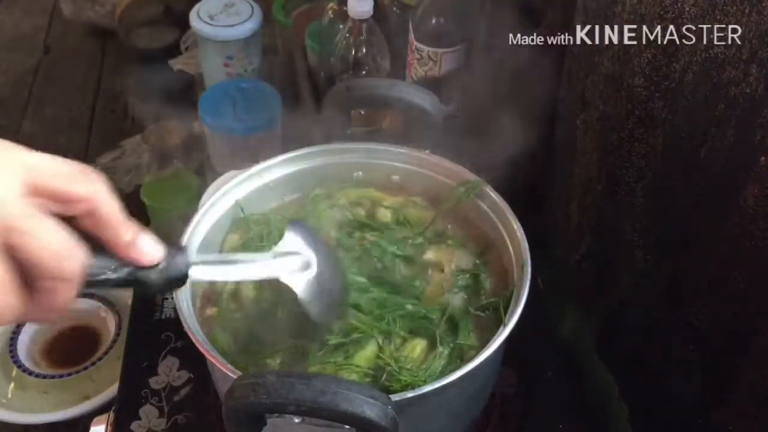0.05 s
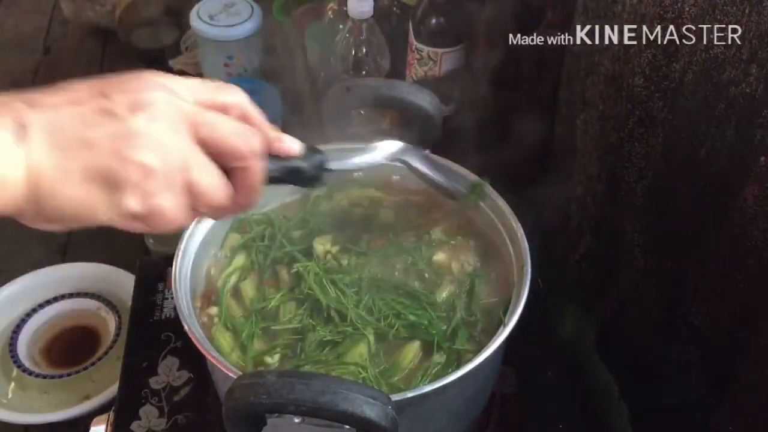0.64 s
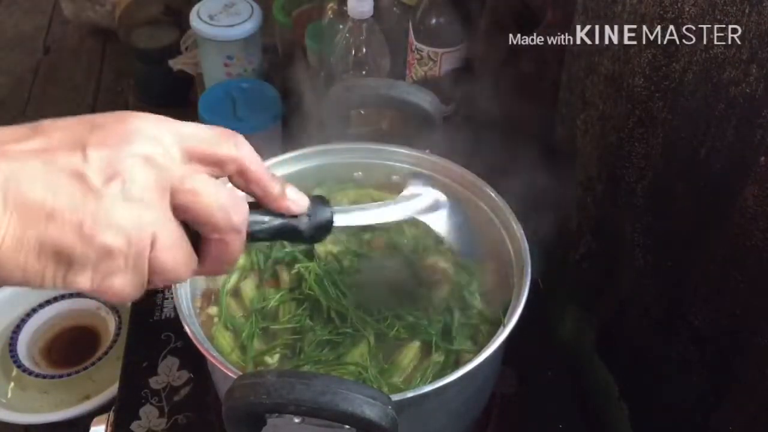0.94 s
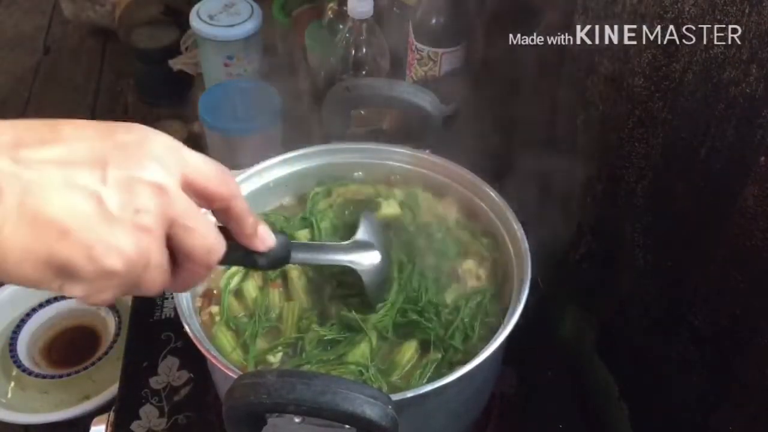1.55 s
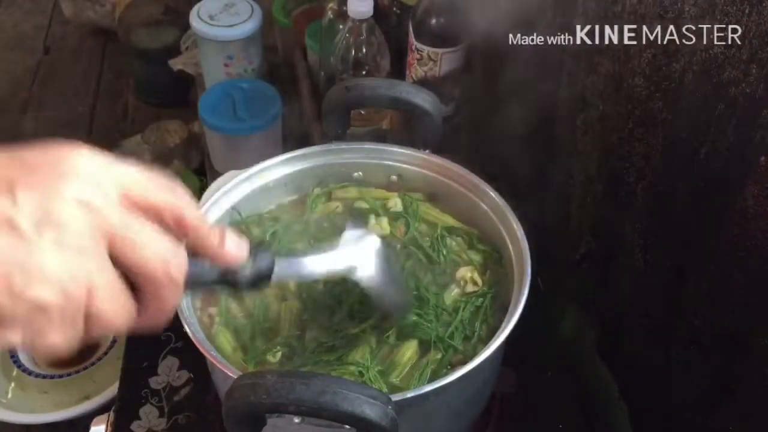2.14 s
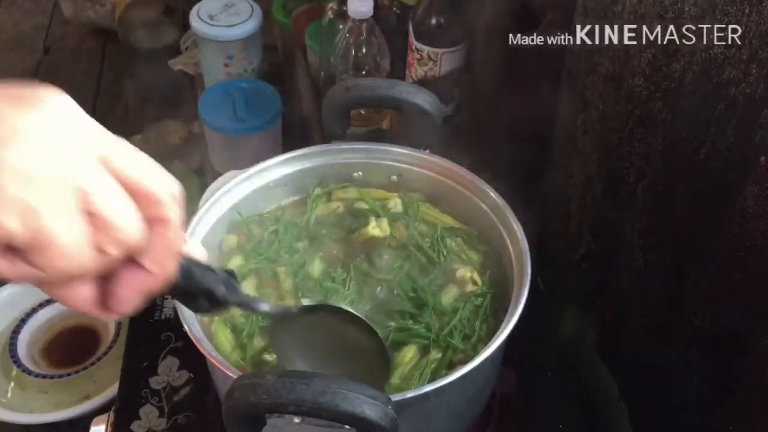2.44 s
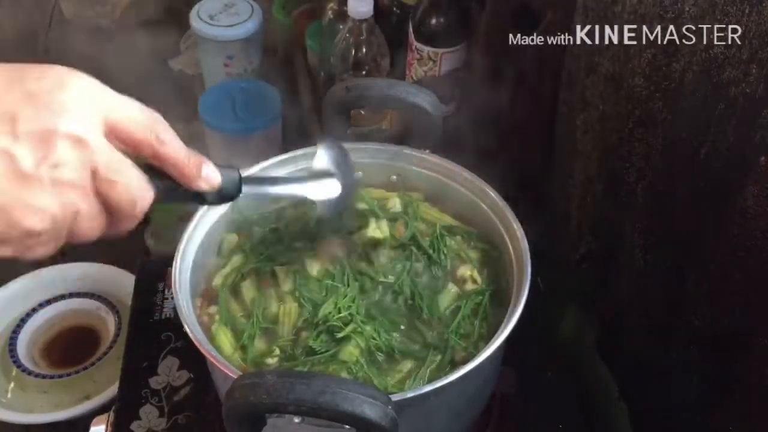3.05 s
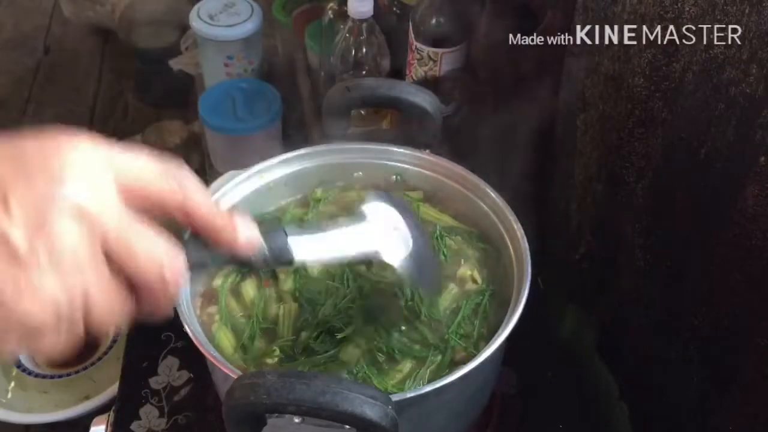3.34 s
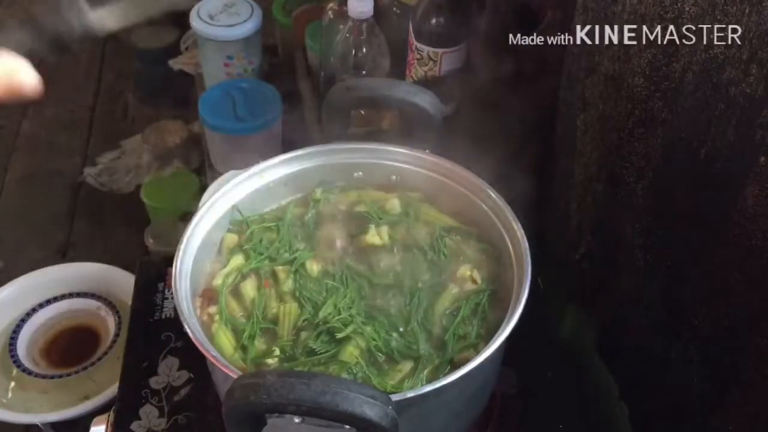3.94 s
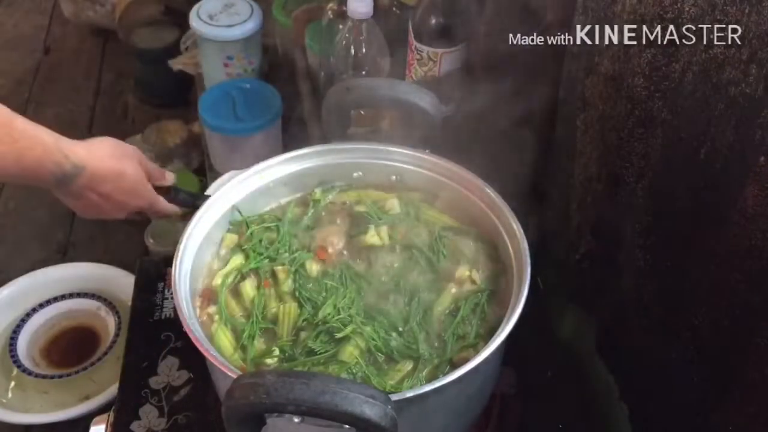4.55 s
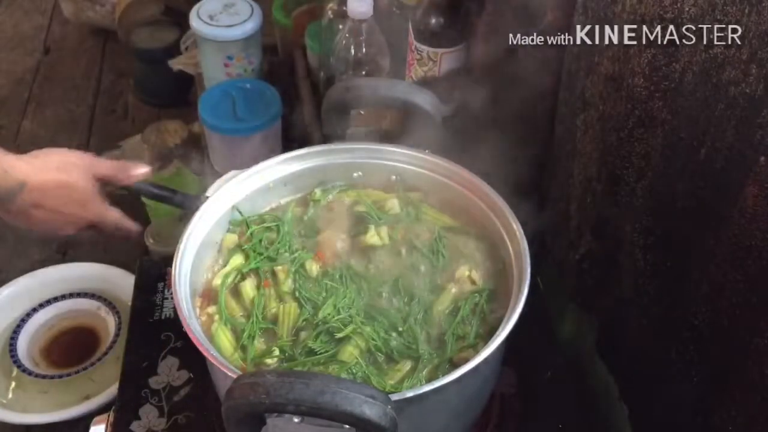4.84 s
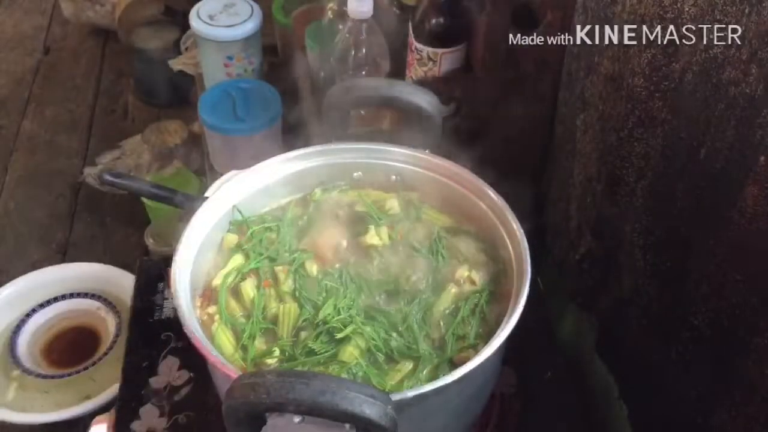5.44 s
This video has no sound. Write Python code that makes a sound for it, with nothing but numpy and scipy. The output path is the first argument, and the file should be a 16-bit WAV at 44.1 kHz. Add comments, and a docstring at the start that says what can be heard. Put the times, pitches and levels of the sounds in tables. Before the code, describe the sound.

Close bubbling and popping of a boiling pot, soft wet stirring and ringing ladle knocks, over distant birds and a low kitchen drone.

```python
"""Bubbles pop all the time in a boiling pot of curry, as steam breaks through the surface.
A steel ladle swishes the wet greens under and knocks on the pot, making the metal ring.
At the end the ladle is laid on a wooden board, which clacks and booms.
Small birds chirp some way off, over the low drone of the kitchen."""
import sys
import numpy as np
from scipy import signal
from scipy.fft import rfft, irfft, next_fast_len
from scipy.io import wavfile
from scipy.ndimage import map_coordinates

SR = 44100
rng = np.random.default_rng(int(sys.argv[2]) if len(sys.argv) > 2 else 0)


def log_audio(samples):
    """Write samples as a 16-bit WAV file to the path given in sys.argv[1]."""
    # one column per channel
    frames = np.atleast_2d(samples).T
    # limit to full scale, then quantise
    limited = np.clip(frames, -1, 1)
    pcm = np.round(limited * 32767).astype(np.int16)
    wavfile.write(sys.argv[1], SR, pcm)


N = 251811

# The loudest bubble pops: start_s, level_db, pitch_hz
LOUD_POPS = [(0.03, -34, 1450), (0.045, -30, 1300), (0.071, -28, 1710), (0.079, -22, 2590),
             (0.172, -31, 1050), (0.189, -34, 1270), (0.347, -34, 1080), (0.431, -33, 1180),
             (0.44, -35, 996), (0.562, -39, 1010), (0.581, -33, 1740), (0.653, -35, 1520),
             (0.677, -38, 703), (0.692, -35, 1000), (0.727, -29, 1330), (0.748, -36, 942),
             (0.791, -28, 3360), (0.885, -35, 945), (1.044, -34, 2210), (1.124, -38, 2860),
             (1.317, -38, 1280), (1.379, -38, 1130), (1.431, -37, 1180), (1.509, -29, 1270),
             (1.654, -30, 867), (1.671, -29, 1420), (1.681, -31, 1210), (1.785, -38, 1190),
             (1.835, -37, 1160), (1.896, -31, 1200), (1.909, -20, 1960), (1.93, -28, 1320),
             (2.139, -33, 1270), (2.277, -31, 1640), (2.535, -35, 2010), (2.677, -33, 964),
             (2.699, -28, 1360), (2.749, -35, 1230), (2.786, -30, 1430), (2.81, -34, 2440),
             (2.829, -32, 1440), (2.862, -30, 1880), (2.885, -34, 891), (2.966, -27, 2220),
             (3.01, -38, 1960), (3.04, -34, 1080), (3.164, -31, 1900), (3.185, -30, 1030),
             (3.202, -25, 2010), (3.383, -32, 1320), (3.456, -32, 931), (3.527, -36, 751),
             (3.638, -29, 2130), (3.789, -29, 1350), (3.891, -29, 1450), (3.929, -36, 1010),
             (3.952, -31, 1140), (3.97, -33, 2040), (3.999, -33, 2700), (4.023, -33, 2120),
             (4.091, -29, 1440), (4.234, -32, 1420), (4.492, -33, 735), (4.535, -35, 1500),
             (4.657, -32, 1200), (4.885, -34, 1280), (4.926, -35, 956), (5.04, -33, 1420),
             (5.054, -30, 1320), (5.25, -38, 869), (5.33, -33, 1780), (5.412, -35, 1350),
             (5.555, -27, 1140), (5.64, -37, 1220)]
def pops():
    """Single bubbles burst, each with a wet splash; quieter ones come by chance."""
    out, t = np.zeros(N), np.arange(2048) / SR
    usual_hz = 1100
    quiet_pops = chance(per_s=6, db=-42, scatter_db=2.5, hz=usual_hz, octaves=.5)
    for s, db, hz in LOUD_POPS + quiet_pops:
        life, delay = rng.random(2)
        pop = amp(db) * bubble(hz, cycles=(.9 + life) * np.sqrt(hz / usual_hz), rise=.15)
        splash = amp(db - 19) * fade(t, .04) * noise_band(hz, 1.1, len(t))
        add(out, s + .0002, pop)
        add(out, s + .004 + .008 * delay, amp(-14) * pop)  # bounces off the pot and the wall
        add(out, s + .0008, splash)
    return out


# Gulps of steam: middle_s, half_length_s, level_db, pitch_hz
STEAM_GULPS = [(0.068, 0.022, -45.5, 1500), (0.192, 0.022, -48, 1040), (0.43, 0.01, -47.5, 1510),
               (0.573, 0.013, -48.5, 1190), (0.741, 0.016, -47, 1150), (0.901, 0.022, -46, 970),
               (1.407, .012, -50, 2280), (2.88, .014, -49, 1510), (3.385, 0.011, -45, 1500),
               (3.46, 0.0087, -45, 2580), (3.658, 0.016, -49, 2100), (3.774, 0.012, -51, 1500),
               (3.877, 0.017, -49, 1700), (3.943, .014, -47, 1800), (4.013, 0.017, -51.5, 2020),
               (4.247, 0.016, -50, 1280), (5.046, 0.015, -45, 1400), (5.337, 0.015, -46, 1377),
               (5.432, 0.011, -48, 1390), (5.48, 0.011, -47.5, 1630)]
def gulps():
    """Each gulp of steam breaks into froth: eight bubbles and a hiss that comes and goes."""
    out = np.zeros(N)
    for s, half, db, hz in STEAM_GULPS:
        size = int(6 * half * SR)
        clump = np.zeros(size)
        for when, pitch, loud in np.clip(rng.standard_normal((8, 3)), -2, 2):
            pop = bubble(hz * np.exp(.3 * pitch), cycles=1.4, rise=.15)
            add(clump, half * (3 + when), amp(4 * loud) * pop)
        hiss = swell(np.arange(size) / SR, 3 * half, half) * noise_band(hz, 1, size)
        add(out, s - 3 * half, amp(db) * (.38 * unit(clump) + .18 * unit(hiss)))
    return out


# The tone of the soft seething: pitch_hz, relative_db
SEETHE_SPECTRUM = [(20, -37), (150, -3.5), (450, -7.5), (750, -4.5), (950, -4.5), (1170, -2.5), (1450, -14),
                   (2500, -11.5), (4000, -20.5), (8000, -41), (16000, -45)]
def simmer():
    """Tiny bubbles and a soft seething make the steady boil, slowly drifting in loudness."""
    heat = amp(-52 + 4.1 * wobble(3.6))
    surge_db = 1.5 * wobble(25)  # steam reaches the surface unevenly
    bubbles = fizz(count=2000, hz=1350, spread=.42, size_db=4, cycles=1.6)
    bubbles *= amp(-7 + surge_db + 1.1 * wobble(45))
    seethe = amp(-5.5 + surge_db) * noise(SEETHE_SPECTRUM, N)
    return heat * (bubbles + seethe)


# Strokes of the ladle: middle_s, half_length_s, swish_db, spray_db
LADLE_STROKES = [(0.101, 0.033, -49, -54.5), (1.562, 0.024, -51, -61), (1.625, 0.019, -44, -52),
                 (1.676, 0.02, -45, -64), (2.157, 0.011, -45.5, -56.5), (2.32, 0.028, -47, -54.5),
                 (2.594, 0.022, -51.5, -62), (2.682, 0.017, -48.5, -59.5), (2.833, 0.019, -54.5, -58.5),
                 (2.962, 0.011, -45, -53), (3.055, 0.0074, -49, -54), (3.259, 0.024, -52.5, -52.5),
                 (3.533, 0.015, -50.5, -64)]
# The tone of the swish: pitch_hz, relative_db
SWISH_SPECTRUM = [(20, -46), (200, -24), (900, -5.5), (2500, -7.5), (4500, -17), (7000, -32),
                  (10000, -31.5), (16000, -30)]
def stirring():
    """Wet greens swish, squelch, slosh and spray as the ladle pushes them under."""
    t = np.arange(N) / SR
    push = sum(amp(db) * swell(t, s, half) for s, half, db, _ in LADLE_STROKES)
    spray = sum(amp(db) * swell(t, s, half) for s, half, _, db in LADLE_STROKES)
    squelch = amp(-3) * fizz(count=2000, hz=1500, spread=.55, size_db=4, cycles=1.2)
    crackle = fizz(count=3000, hz=5200, spread=.45, size_db=3, cycles=1)
    swish = amp(-3.5) * noise(SWISH_SPECTRUM, N)
    slosh = amp(-11) * noise_band(290, .79, N)
    return push * (swish + squelch + slosh) + spray * crackle


# Light drags of the ladle through the pot: middle_s, half_length_s, level_db, pitch_hz
LADLE_DRAGS = [(0.23, 0.063, -58, 1160), (0.927, 0.069, -58.5, 1117), (2.662, 0.022, -61.5, 3750),
               (2.822, 0.023, -55.5, 3900)]
def drags():
    """The ladle drags through the pot: the wall hums, or the leaves rasp."""
    t = np.arange(N) / SR
    return sum(amp(db) * swell(t, s, half) * noise_band(hz, .22, N) for s, half, db, hz in LADLE_DRAGS)


# The loudest snaps and spits of the greens: start_s, relative_db, pitch_hz
LOUD_SNAPS = [(0.0806, -35, 3000), (.791, -35, 3150), (0.095, -41, 4650), (.275, -51, 5030),
              (0.369, -46, 5500), (0.886, -38, 4250), (0.941, -41.5, 10700), (1.9092, -33, 3040),
              (1.931, -44.5, 11500), (2.58, -35, 2930), (2.585, -42, 3250), (2.7, -43, 2960),
              (2.717, -44.5, 2600), (3.1863, -42.5, 4900), (3.2894, -31.5, 2390), (3.552, -46, 5500),
              (4.237, -45, 4460), (4.494, -42, 3500), (5.482, -41.5, 5700)]
def snaps():
    """A stalk snaps or a drop spits with a click and a short hiss; fainter ones come by chance."""
    out, t = np.zeros(N), np.arange(1024) / SR
    spatter = chance(per_s=3, db=-54, scatter_db=2, hz=4800, octaves=.45)
    for s, db, hz in LOUD_SNAPS + spatter:
        add(out, s + .001, amp(db + 8) * bubble(hz, cycles=.9, rise=0))
        add(out, s + .00057, amp(db - 1.5) * fade(t, .023) * noise_band(hz, .91, len(t)))
    return out


# The ladle hits the pot: start_s, contact_s, tap_db, tap_hz, scrape_db,
# ladle_db, rim_db, boosted_rim_hz, pot_db, slosh_db
POT_KNOCKS = [(0.466, 0.0034, -28, 3000, -32.5, -43.5, -47, 4370, -61, -34.5),
              (1.1754, 0.004, -31, 1900, -10.5, -18.5, -51, 4345, -25, -46),
              (1.1792, 0.0021, -3, 2580, -10.5, -15.5, -35, 4345, -19, -30),
              (1.1845, 0.0018, -15.5, 3000, -17.5, -21, -48, 4345, -26, -41.5),
              (2.0587, 0.0016, -8, 2000, -23, -43, -48, 3687, -25, -41),
              (3.3007, 0.001, 0.5, 1650, -14.5, -40, -37.5, 3687, -15.5, -26.5)]
# The ringing tones of the ladle, the pot's rim and its full body: pitch_hz, relative_db, fade_s
LADLE_TONES = [(3160, 1, 0.042), (3706, 2, 0.05), (3790, -2, 0.047), (4370, 4, 0.05), (5380, -10, 0.05),
               (6520, -16, .08), (8730, 4, 0.018), (11480, -16, 0.11)]
RIM_TONES = [(3687, 0, 0.29), (4345, 0, 0.21), (5230, -7, .14), (6280, -8, .16), (7090, -8, .12),
             (7430, -9, .1)]
POT_TONES = [(172, -21, 0.07), (240, -19, 0.06), (744, 0, .06), (950, -7, 0.035), (1130, -1, .045),
             (1330, -3, 0.02), (1460, -5, .02), (1846, -3, 0.02), (2020, 1, .02), (2160, -3, .02),
             (2316, -9, 0.025)]
# The tone of steel skidding on the pot: pitch_hz, relative_db
SCRAPE_SPECTRUM = [(20, -45.5), (150, -20), (500, -22), (1000, -6), (2200, -4.5), (3200, -3), (5000, -8.5),
                   (7000, -6.5), (9000, -13.5), (13000, -15), (16000, -19.5)]
def knocks():
    """The ladle taps and skids; ladle and rim ring on, while the curry sloshes and muffles the pot."""
    out, t = np.zeros(N), np.arange(SR // 3) / SR
    for s, contact, tap_db, tap_hz, scrape_db, ladle_db, rim_db, rim_hz, pot_db, slosh_db in POT_KNOCKS:
        tap = amp(tap_db) * bubble(tap_hz, cycles=.8, rise=0)
        skid = amp(-1.5) * fade(t - contact, .008) + amp(-9.5) * fade(t - contact, .067)
        scrape = amp(scrape_db) * skid * noise(SCRAPE_SPECTRUM, len(t))
        body = ring(POT_TONES, t, contact, blur_hz=10)
        body += amp(1) * fade(t - contact, .033) * noise_band(1700, .9, len(t))
        ladle = amp(ladle_db) * ring(LADLE_TONES, t, contact, blur_hz=45)
        rim = amp(rim_db) * ring(RIM_TONES, t, contact, blur_hz=4, boosted_hz=rim_hz)
        jolt = np.minimum(t / .004, 1) * fade(t - .004, .065)
        slosh = amp(slosh_db) * jolt * noise_band(270, 1.2, len(t))
        add(out, s, scrape + ladle + rim + amp(pot_db) * body + slosh)
        add(out, s, tap)
        add(out, s + .0052, amp(-14) * tap)  # a bounce off the pot's wall makes the tap hollow
    return out


# The ladle lands on the board: start_s, relative_clack_db, relative_boom_db, boosted_hz
BOARD_LANDINGS = [(4.683, -35, -36.5, 173), (4.743, -30.5, -31.5, 316)]
# The ringing tones of the board: pitch_hz, relative_db, fade_s
BOARD_TONES = [(173, 0, 0.26), (238, -3, 0.2), (297, -2, 0.2), (335, -8, .24), (484, -7, 0.2),
               (549, -5, 0.23)]
# The tone of steel hitting wood: pitch_hz, relative_db
CLACK_SPECTRUM = [(20, -45), (150, -3), (300, 1), (600, -10.5), (980, 6.5), (1300, -2.5), (1850, 3),
                  (2700, -10.5), (4000, -17), (8000, -31), (16000, -50)]
def landing():
    """A soft low bump; then handle and bowl clack on the wood, and the board booms as the ladle rocks."""
    out, t = np.zeros(N), np.arange(SR // 2) / SR
    bump = ring(BOARD_TONES[:3], t, contact_s=.017, blur_hz=15, boosted_hz=238) * fade(t, .21)
    add(out, 4.135, amp(-36.5) * bump)
    for s, clack_db, boom_db, boosted_hz in BOARD_LANDINGS:
        clack = (fade(t, .032) + amp(4) * fade(t, .19)) * noise(CLACK_SPECTRUM, len(t))
        boom = ring(BOARD_TONES, t, contact_s=.026, blur_hz=6, boosted_hz=boosted_hz)
        # the softer blow is duller
        boom = filtered(boom, lambda hz: 1 / np.sqrt(1 + (hz / (2 * boosted_hz)) ** 6))
        add(out, s, amp(clack_db) * clack + amp(boom_db + 2.5) * boom)
    return out


# Bird notes that slide down or up: start_s, length_s, first_hz, last_hz, relative_db
BIRD_GLIDES = [(0.544, 0.035, 4470, 4120, -48), (0.569, 0.036, 3720, 3200, -50.5),
               (0.853, 0.048, 6180, 5250, -48.5), (0.878, 0.06, 4980, 3560, -44.5),
               (0.951, .085, 3410, 5240, -42.5), (1.82, 0.063, 6000, 5260, -45.5),
               (1.823, 0.066, 4650, 3800, -44), (1.912, 0.048, 3800, 5240, -40),
               (2.233, 0.026, 6540, 6110, -47), (2.262, 0.024, 5230, 5180, -37.5),
               (2.243, 0.055, 4590, 3720, -39.5), (2.303, 0.056, 3583, 4177, -36),
               (4.141, 0.065, 6200, 4620, -47), (4.147, 0.051, 4590, 3690, -40),
               (4.218, .055, 3260, 4140, -40.5), (4.515, 0.055, 6410, 5690, -37),
               (4.533, .075, 5240, 3900, -39), (4.614, 0.06, 4040, 5320, -38.5),
               (4.855, 0.07, 5870, 4130, -43.5), (4.939, 0.037, 3790, 3470, -47),
               (4.961, 0.063, 3640, 4660, -44)]
# Runs of short notes that rise and fall: start_s, note_count, relative_db
BIRD_TWITTERS = [(0.634, 3, -45.5), (4.104, 1, -41.5), (4.32, 3, -46.5), (5.084, 3, -46.5)]
def birds():
    """Small birds call and twitter, far enough off to arrive mostly as echo."""
    song = np.zeros(N)
    note_gap_s = .036
    for s, length, first, last, db in BIRD_GLIDES:
        add(song, s, amp(db) * chirp(length, first, np.sqrt(first * last), last))
    for s, count, db in BIRD_TWITTERS:
        for k in range(round(count)):
            note = chirp(length_s=.016, first_hz=4120, middle_hz=4740, last_hz=4120)
            add(song, s + k * note_gap_s, amp(db) * note)
    far = echo(song, [(3000, .35), (7000, .32)], build_s=.012)
    return amp(-19) * song + amp(-.5) * far


def chirp(length_s, first_hz, middle_hz, last_hz):
    """One bird note slides through three pitches; the wider the slide, the raspier it is."""
    progress = np.arange(int(length_s * SR)) / (length_s * SR)
    hz = np.polyval(np.polyfit([0, .5, 1], [first_hz, middle_hz, last_hz], 2), progress)
    flutter = map_coordinates(rng.standard_normal(128), [progress * length_s * 700])
    hz *= 1 + (.045 + .13 * abs(np.log(first_hz / last_hz))) * flutter
    loudness = np.abs(np.sin(np.pi * progress)) ** .59
    return loudness * np.sin(2 * np.pi * np.cumsum(hz) / SR)


# The low tones of the drone: pitch_hz, width_hz, relative_db
DRONE_TONES = [(89, 6, 0), (171, 8, -9), (236, 10, -15), (297, 14, -19)]
# How loud the drone is over time: time_s, level_db
DRONE_LEVELS = [(0, -46.5), (.45, -55), (1.572, -43.5), (1.899, -50), (4.349, -53.5), (5.71, -51)]
# The tone of the kitchen's hush: pitch_hz, relative_db
HUSH_SPECTRUM = [(22, -46.5), (32, -22.5), (45, -0.5), (62, 1), (120, -2), (200, -7.5), (400, -19.5),
                 (1200, -35), (3000, -32.5), (6000, -34.5), (8300, -31), (10500, -40.5), (15500, -38)]
def background():
    """A low drone wavers over the steady hush of the kitchen."""
    peaks = lambda f: sum(amp(db) / (1 + ((f - hz) / width) ** 2) for hz, width, db in DRONE_TONES)
    drone = unit(filtered(rng.standard_normal(N), lambda f: peaks(f) * (f > 35)))
    level_db = np.interp(np.arange(N) / SR, *np.transpose(DRONE_LEVELS))
    return amp(level_db) * drone + amp(-51) * noise(HUSH_SPECTRUM, N)


def bubble(hz, cycles, rise):
    """A bursting bubble swells and stops quickly, rising in pitch as it opens; with no rise, a click."""
    turns = hz * np.arange(SR // 60) / SR
    age = turns / cycles
    loudness = (age * np.exp(1 - age)) ** 3
    return loudness * np.sin(2 * np.pi * (turns + rise * cycles * (age - 2 * np.log1p(age))))


def fizz(count, hz, spread, size_db, cycles):
    """Many small bubbles burst, each with a random time, pitch and size."""
    starts = (rng.random(count) * N).astype(int)
    pitches = np.minimum(hz * np.exp(spread * rng.standard_normal((count, 1))), SR / 4)
    sizes = np.minimum(rng.exponential(size=(count, 1)), 3)
    bubbles = amp(size_db * sizes) * bubble(pitches, cycles, rise=.15)
    index = starts[:, None] + np.arange(bubbles.shape[1])
    return unit(np.bincount(index.ravel(), bubbles.ravel(), N)[:N])


def ring(tones, t, contact_s, blur_hz, boosted_hz=None):
    """A struck object's tones grow during contact, then die away; rattling blurs their pitch."""
    hz, db, fade_s = np.transpose(tones)[:, :, None]
    if boosted_hz:  # the spot that is struck favours tones near this pitch
        db = db + 6.5 * np.exp(-(np.log2(hz / boosted_hz) / .15) ** 2)
    drift = np.cumsum(rng.standard_normal((len(tones), len(t))), axis=1)
    waves = np.sin(2 * np.pi * hz * t + drift * np.sqrt(2 * np.pi * blur_hz / SR))
    return np.minimum(t / contact_s, 1) * np.sum(amp(db) * fade(t - contact_s, fade_s) * waves, axis=0)


def echo(x, fade_times, build_s=.0041):
    """Sound comes back off the walls about as strong as x; each pitch dies at its own speed."""
    hz, t, bands = signal.stft(rng.standard_normal(SR // 2), SR, nperseg=256)
    tail = signal.istft(bands * fade(t, along(fade_times, hz)[:, None]), SR, nperseg=256)[1]
    tail *= np.minimum(np.arange(len(tail)) / SR / build_s, 1)
    return signal.fftconvolve(x, tail / np.linalg.norm(tail))[:N]


def chance(per_s, db, scatter_db, hz, octaves):
    """Random events, as rows of start_s, level_db, pitch_hz."""
    count = int(per_s * N / SR)
    when = rng.random(count) * N / SR
    size, pitch = np.clip(rng.standard_normal((count, 2)), -2, 2).T
    return list(zip(when, db + scatter_db * size, hz * 2 ** (octaves * pitch)))


def noise(spectrum, size):
    """Noise with the tone that a table gives it."""
    return unit(filtered(rng.standard_normal(size), lambda hz: amp(along(spectrum, hz))))


def noise_band(centre_hz, octaves, size):
    """Noise around one pitch; more octaves make it wider."""
    band = lambda hz: (1 + (np.log2((hz + 1) / centre_hz) / octaves) ** 2) ** -2
    return unit(filtered(rng.standard_normal(size), band))


def wobble(per_s):
    """A smooth curve through per_s random values each second."""
    return map_coordinates(rng.standard_normal(1024), [np.arange(N) * per_s / SR], mode="mirror")


def swell(t, middle_s, half_length_s):
    """A smooth rise and fall, shaped like a bell."""
    return np.exp(-((t - middle_s) / half_length_s) ** 2 / 2)


def fade(t, fade_s):
    """Full level until t = 0, then 60 dB quieter every fade_s."""
    return np.exp(-np.log(1000) * np.maximum(t, 0) / fade_s)


def filtered(x, response):
    """Turn each pitch in x up or down by response(hz)."""
    size = next_fast_len(len(x) + 8192)
    return irfft(rfft(x, size) * response(np.fft.rfftfreq(size, 1 / SR)), size)[:len(x)]


def along(points, hz):
    """Read between the rows of a table of pitch_hz, value."""
    pitches, values = np.transpose(points)
    return np.interp(np.log(hz + 1), np.log(pitches + 1), values)


def amp(db):
    """Turn decibels into a multiplier."""
    return 10 ** (np.asarray(db) / 20)


def unit(x):
    """Scale x to an average strength (rms) of 1."""
    return x / np.sqrt(np.mean(x ** 2) + 1e-20)


def add(track, s, sound):
    """Mix a sound into the track at s seconds."""
    start = max(round(s * SR), 0)
    track[start:start + len(sound)] += sound[:max(len(track) - start, 0)]


# How long the kitchen echoes: pitch_hz, fade_s
KITCHEN_ECHO = [(150, 0.25), (450, .15), (1500, 0.19), (5000, 0.2), (14000, 0.15)]
def scene():
    """The curry and the ladle are close, with little echo; birds and drone lie behind them."""
    curry = simmer() + gulps() + pops() + stirring() + drags() + snaps()
    ladle = knocks() + landing()
    room = amp(-10) * echo(curry, KITCHEN_ECHO) + amp(-12) * echo(ladle, KITCHEN_ECHO)
    return (curry + ladle + room + birds() + background())[None]


def record(dry):
    """The hardest knocks flatten at full level; the deepest bass and highest treble are cut."""
    bottom_hz, top_hz = 28, 15900
    flattened = dry[0] / (1 + dry[0] ** 6) ** (1 / 6)
    passband = lambda hz: (1 - 1 / (1 + (hz / bottom_hz) ** 6)) / np.sqrt(1 + (hz / top_hz) ** 160)
    return filtered(flattened, passband)[None]


dry = scene()
out = record(dry)
log_audio(out)
```